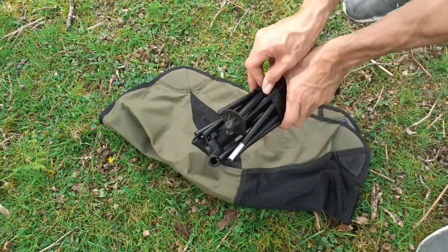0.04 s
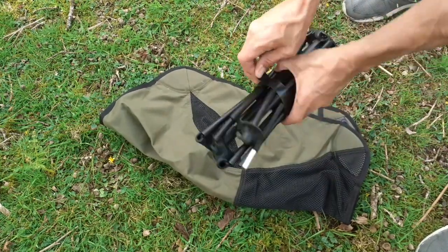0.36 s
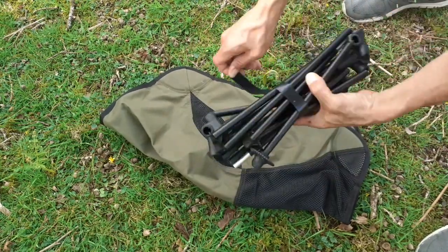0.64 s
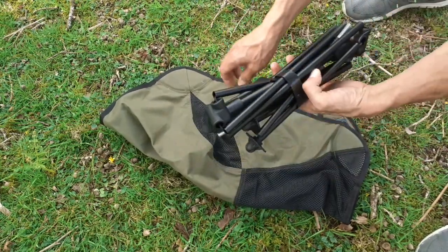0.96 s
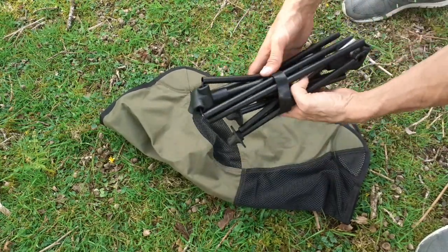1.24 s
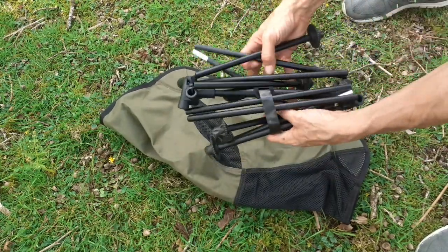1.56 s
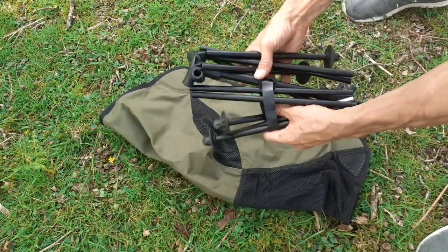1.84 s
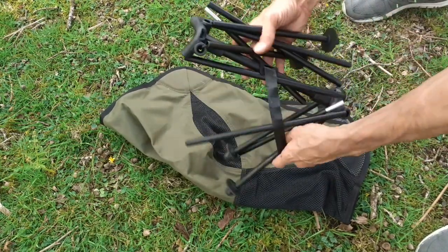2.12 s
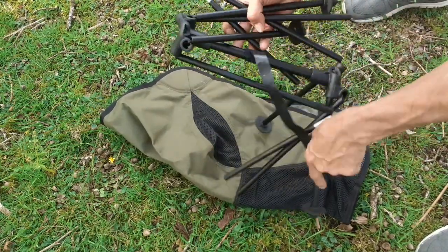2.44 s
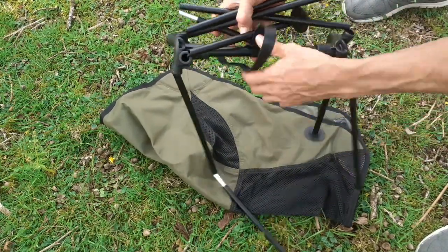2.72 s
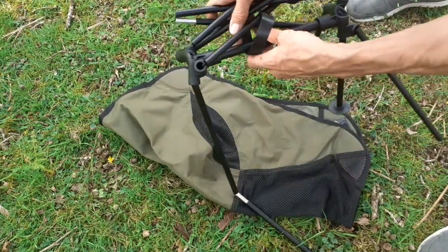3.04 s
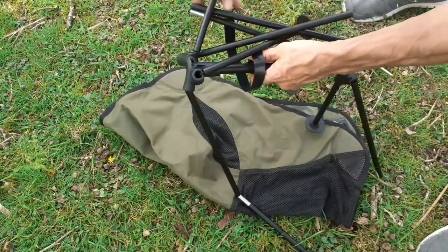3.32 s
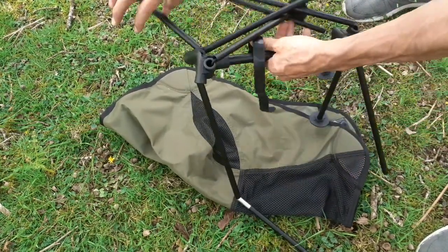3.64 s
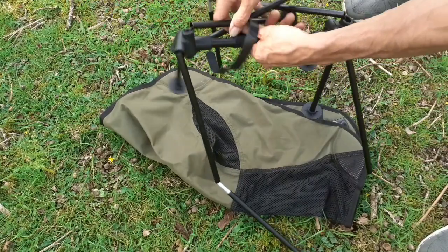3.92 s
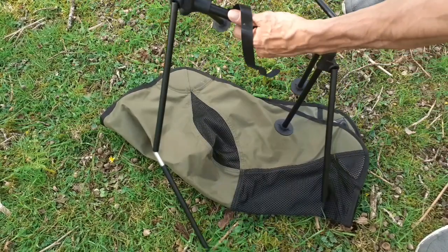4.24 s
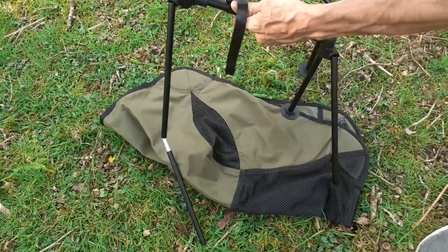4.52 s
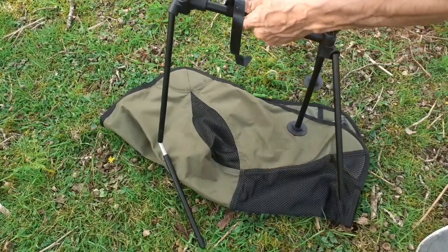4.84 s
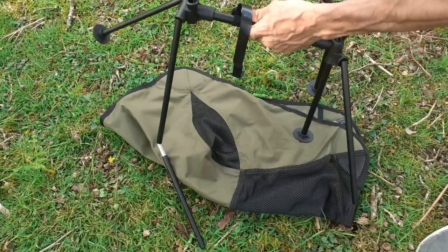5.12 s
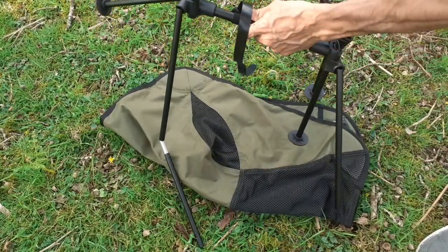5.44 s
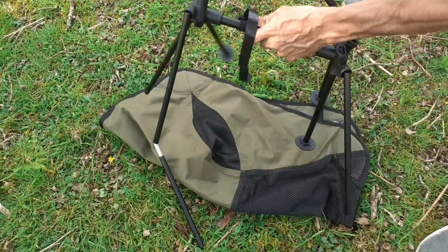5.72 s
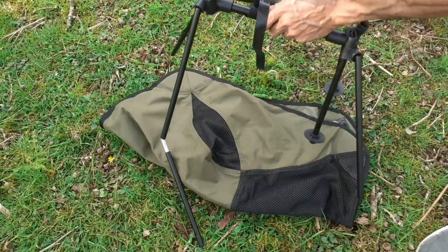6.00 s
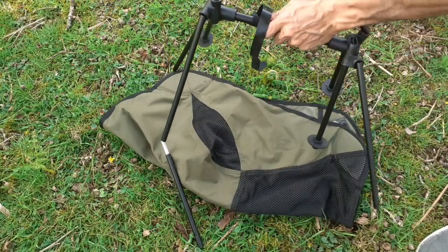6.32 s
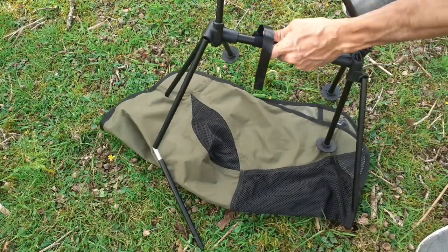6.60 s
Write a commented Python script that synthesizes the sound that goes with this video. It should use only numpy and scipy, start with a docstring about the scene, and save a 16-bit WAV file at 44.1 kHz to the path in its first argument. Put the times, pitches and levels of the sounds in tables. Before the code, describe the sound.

Close by outdoors, a fastening strap tears open and camp chair poles slide together and clack into place, with light wind.

```python
"""Unpacking a camp chair on a lawn

A hook-and-loop strap rips open close by, in a rush of tiny snaps. The bundled poles scrape over each
other and the canvas bag, and their elastic cords pull them into the plastic hubs with ringing clacks.
Light wind bumps the two microphones; the garden is quiet and gives only a faint echo."""
import sys
import numpy as np
from scipy import signal
from scipy.fft import rfft, irfft, next_fast_len
from scipy.io import wavfile
from scipy.ndimage import map_coordinates

SR = 44100
rng = np.random.default_rng(int(sys.argv[2]) if len(sys.argv) > 2 else 0)


def wrap_up_sound(samples):
    """Save the sound to the file named by the first command line argument, as 16-bit audio."""
    columns = np.atleast_2d(samples).T
    # keep every value between -1 and 1, then stretch to whole-number steps
    tamed = np.clip(columns, -1, 1)
    steps = np.round(tamed * 32767).astype(np.int16)
    wavfile.write(sys.argv[1], SR, steps)


N = 293909

# tone of poles scraping together: f/Hz, level/dB
SCRAPE_TONE = [(400, -35), (800, -7.5), (1200, -10.5), (1800, -0.5), (4400, 2), (7500, -1.5), (9000, -15),
               (11000, -31.5)]
# tone of the thin hiss above the scrape: f/Hz, level/dB
HISS_TONE = [(7000, -15.5), (9000, -5), (11000, -1.5), (13000, -9.5), (14000, -3.5), (16000, -15.5)]


def amp(db):
    """Turn decibels into a factor to multiply by."""
    return 10 ** (np.asarray(db) / 20)


def unit(x):
    """Scale a sound to an average strength (rms) of 1."""
    return x / np.sqrt(np.mean(x ** 2) + 1e-20)


def along(points, hz):
    """Read between the (f/Hz, value) points of a table, giving each octave equal room."""
    f, values = np.transpose(points)
    return np.interp(np.log(hz + 1), np.log(f), values)


def add(track, start, sound):
    """Mix a sound into the track at start seconds."""
    room = track[:, max(round(start * SR), 0):][:, :sound.shape[-1]]
    room += sound[:, :room.shape[-1]]


def wobble(rate, length):
    """A smooth curve through rate random values a second."""
    knots = rng.standard_normal(int(length * rate / SR) + 4)
    return map_coordinates(knots, [np.arange(length) * rate / SR])


def gesture(t, length, edge):
    """Fade in around t = 0 and out around t = length; a larger edge is gentler (all in seconds)."""
    return (1 + np.tanh(t / edge)) * (1 + np.tanh((length - t) / edge)) / 4


def filtered(x, response):
    """Turn each frequency up or down by response(hz)."""
    n = x.shape[-1]
    size = next_fast_len(n + 2048)
    return irfft(rfft(x, size) * response(np.fft.rfftfreq(size, 1 / SR)), size)[..., :n]


def coloured(x, tone):
    """Shape a sound with a tone table, then scale it to strength 1."""
    return unit(filtered(x, lambda hz: amp(along(tone, hz))))


def morphed(x, gain):
    """Filter a sound by gain(hz, t), so its tone changes over time."""
    hz, t, spectra = signal.stft(x, SR, nperseg=512)
    return signal.istft(spectra * gain(hz[:, None], t), SR, nperseg=512)[1][:, :x.shape[1]]


def stereo_noise(length, apart):
    """Left and right noise: the same when apart is 0, unrelated when it is 1."""
    common, own = rng.standard_normal((2, length))
    return unit(np.array([common + apart * own, common - apart * own]))


def grains(length, rate, life, spread_db):
    """The jumpy loudness of tiny random slips: about rate a second, each fading over life seconds."""
    sizes = amp(spread_db * np.clip(rng.standard_normal(length), -2, 2))
    slips = sizes * (rng.random(length) < rate / SR)
    decay = np.exp(-2 * np.arange(SR // 50) / SR / life)
    return unit(np.sqrt(np.abs(signal.fftconvolve(slips ** 2, decay)[:length])))


def resonance(hz, centre_hz, width_hz):
    """A peak of height 1 around a pitch at which something likes to ring."""
    return 1 / (1 + (2 * (hz - centre_hz) / width_hz) ** 2)


def ringing(hz, peaks, base_db):
    """Several ringing peaks on top of a flat base."""
    return amp(base_db) + sum(amp(db) * resonance(hz, f, width) for f, width, db in peaks)


def frame_gain(hz, base_db):
    """The chair's tubes and hubs boost the pitches at which they ring."""
    # ringing peaks of the frame: f/Hz, width/Hz, level/dB
    frame_peaks = [(2220, 3000, -3.5), (3170, 450, -9.5), (3980, 290, -4), (4450, 330, -8), (5010, 960, -4),
                   (6440, 400, -22), (7160, 1800, -5.5), (9900, 75, -0.5), (12300, 2200, 0.5)]
    return ringing(hz, frame_peaks, base_db)


def ripple(hz, depth_db, spacing_hz):
    """Many weaker rings: a new pattern of peaks and dips for every spot that is struck."""
    knots = rng.standard_normal(int(hz[-1] / spacing_hz) + 4)
    return amp(depth_db * map_coordinates(knots, [hz / spacing_hz]))


def patches(hz, t, depth_db, spacing_hz, life):
    """Peaks and dips that come and go as the point of contact travels."""
    where = np.broadcast_arrays(hz / spacing_hz, t / life)
    knots = rng.standard_normal([int(w.max()) + 2 for w in where])
    return amp(depth_db * map_coordinates(knots, where))


def garden_air():
    """The soft, steady hush of a quiet garden."""
    # tone of the hush: f/Hz, level/dB
    air_tone = [(30, -11.5), (120, -7), (450, 4.5), (1000, 0.5), (2000, -7.5), (7000, -14.5), (9000, -19),
                (16000, -27.5)]
    return amp(-65) * coloured(stereo_noise(N, apart=0.62), air_tone)


def garden_echo(x):
    """Sound scatters back from around the lawn; the highest pitches die first."""
    # time the echo takes to fade by 60 dB: f/Hz, t/s
    fade_times = [(200, .25), (2500, 0.37), (14000, 0.17)]
    hz, t, spectra = signal.stft(rng.standard_normal((2, SR // 2)), SR, nperseg=256)
    tail = signal.istft(spectra * amp(-60 * t / along(fade_times, hz)[:, None]), SR, nperseg=256)[1]
    return signal.fftconvolve(x, tail / np.linalg.norm(tail[0]), axes=1)[:, :N]


def wind():
    """From about 3 s on a light draught brushes the microphones, and gusts bump each one separately."""
    # tone of wind on a microphone: f/Hz, level/dB
    rumble_tone = [(25, -22.5), (55, 8), (115, 3.5), (230, -8.5), (400, -25), (700, -31.5), (1500, -84)]
    # gusts: t/s, length/s, level/dB, left minus right/dB
    gusts = [(3.142, .11, -45.5, 21), (3.282, 0.015, -26.5, -12.5), (3.305, 0.14, -38.5, -3),
             (3.457, 0.23, -51, -9), (4.036, 0.043, -51.5, -8), (4.184, 0.033, -50.5, 24.5),
             (5.493, 0.017, -47, 27.5), (5.736, 0.13, -53, 12.5), (6.206, 0.18, -48.5, 26)]
    fade_in = np.interp(np.arange(N) / SR, [2.9, 3], [0, 1])
    draught = fade_in * amp(4.6 * np.array([wobble(5.7, N), wobble(27, N)]))
    out = amp(-71.5) * draught * coloured(rng.standard_normal((2, N)), rumble_tone)
    lead_s = .02  # room for the fade-in
    t = np.arange(SR // 2) / SR - lead_s
    for start, length, db, side_db in gusts:
        bump = gesture(t, length, edge=0.0017) * amp(-4 * np.abs(t) / length)
        wake = amp(-17) * gesture(t, 2 * length, edge=0.0082)
        rumble = coloured(rng.standard_normal((2, len(t))), rumble_tone)
        swirl = (bump + wake) * rumble * amp(4 * wobble(50, len(t)))
        swirl /= np.sqrt(np.sum(swirl ** 2, axis=1, keepdims=True) / (length * SR))  # strength 1
        add(out, start - lead_s, amp([[db + side_db / 2], [db - side_db / 2]]) * swirl)
    return out


def jostling():
    """The loose poles keep brushing and ticking lightly while they lie in the hand."""
    held = gesture(np.arange(N) / SR - 1.15, length=4.35, edge=.05) * amp(2.5 * wobble(12, N))
    ticks = unit(grains(N, rate=92, life=.002, spread_db=5) + .9)
    tubes = filtered(ticks * stereo_noise(N, apart=0.55), lambda hz: frame_gain(hz, base_db=-3.5))
    return held * (amp(-55.5) * coloured(tubes, SCRAPE_TONE) + amp(-66.5) * coloured(tubes, HISS_TONE))


def sliding():
    """Sliding poles catch and slip, which makes them ring; the canvas adds a soft, lower rub."""
    # slides: start t/s, end t/s, relative level/dB, swell from start to end/dB, hiss over scrape/dB
    strokes = [(0.805, 0.904, -55.5, 7, -14), (1, 1.056, -44.5, 14.5, -23), (1.157, 1.2, -39, -10.5, -11.5),
               (1.291, 1.437, -42.5, -1.5, -15), (1.465, 1.583, -35.5, 4, -9.5),
               (1.659, 1.838, -40.5, -5, -10.5), (1.833, 2.123, -55.5, -12, -5.5),
               (2.123, 2.154, -37, 16, -11), (2.202, 2.244, -33.5, 0, -7.5), (2.299, 2.419, -37.5, 8, -5.5),
               (2.513, 2.591, -41.5, 1, -2), (2.908, 2.984, -51.5, 1, -9), (3.117, 3.244, -38, 0, -10),
               (3.314, 3.42, -38, -3.5, -7.5), (3.526, 3.712, -43, 3, -11.5),
               (3.764, 3.856, -49.5, 10, -14), (3.898, 3.926, -35.5, 19.5, -11),
               (4.101, 4.279, -37, 7, -9.5), (4.307, 4.539, -37, 6.5, -6), (4.55, 4.662, -42, -13.5, -15),
               (4.679, 4.774, -40.5, 2.5, -20), (4.889, 4.963, -40.5, -11.5, -16.5),
               (5.026, 5.27, -44, -16, -20), (5.275, 5.408, -38.5, 3.5, -6),
               (5.469, 5.582, -39.5, 9, -13.5), (5.958, 6.027, -58.5, 5, -5), (6.162, 6.179, -45.5, 2, -20),
               (6.384, 6.482, -60.5, -18, -1)]
    # ringing peaks of one freed pole: f/Hz, width/Hz, level/dB
    pole_peaks = [(2160, 340, -4.5), (3390, 340, -3.5), (3880, 260, -2), (4458, 260, -0.5),
                  (6250, 150, -11.5), (7160, 860, -7.5), (9190, 130, -1), (12310, 450, 1.5)]
    # tone of rubbed canvas: f/Hz, level/dB
    canvas_tone = [(90, -24), (220, -12.5), (600, -3.5), (1100, 0.5), (2000, 7), (4000, -43.5)]
    bundled = lambda hz: frame_gain(hz, base_db=-0.5)  # dull rub fills in between the peaks
    freed = lambda hz: ringing(hz, pole_peaks, base_db=-15)
    bundle_opens_s, lead_s = 3.4, .04
    out = np.zeros((2, N))
    t = np.arange(2 * SR // 5) / SR - lead_s
    for start, end, db, swell_db, hiss_db in strokes:
        length = max(end - start, .01)
        progress = np.clip(t / length, 0, 1)
        unsteady_db = 1.4 * wobble(43.3, len(t))
        speed = gesture(t, length, edge=0.015) * amp(swell_db * (progress - .5) + unsteady_db)
        slips = unit(grains(len(t), rate=900, life=.001, spread_db=4) + 1)
        rings = bundled if start < bundle_opens_s else freed
        tube_gain = lambda hz, s: rings(hz) * patches(hz, s, depth_db=3.6, spacing_hz=300, life=.06)
        tubes = morphed(slips * stereo_noise(len(t), apart=0.81), tube_gain)
        cloth = amp(-16) * coloured(slips * stereo_noise(len(t), apart=.3), canvas_tone)
        rub = coloured(tubes, SCRAPE_TONE) + amp(hiss_db) * coloured(tubes, HISS_TONE) + cloth
        add(out, start - lead_s, amp(db) * speed * rub)
    return out * amp([[1.2], [-.8]])  # a little louder on the left


def strap():
    """Rows of hooks tear out of their loops, and the tight strap drums along."""
    # tone of the rip: f/Hz, level/dB
    rip_tone = [(600, -31.5), (1300, -16), (2100, -11), (2800, -6), (5000, -6), (7600, 3), (9500, -2),
                (14800, 0), (16000, -21)]
    # tone of the drumming strap: f/Hz, level/dB
    drum_tone = [(90, -22), (200, 2), (600, 2.5), (1100, 1), (2000, -2), (4000, -29)]
    # single hooks letting go: t/s, level/dB
    single_hooks = [(.009, -35), (.033, -42), (0.152, -43), (0.16, -48), (.18, -35.5), (0.27, -28),
                    (0.304, -21.5), (.636, -20.5), (.719, -38.5)]
    peel_s, full_speed_s, free_s = .2, 0.32, 0.6384
    t = np.arange(N) / SR
    rise_db = -16.5 * np.maximum(full_speed_s - t, 0) / (full_speed_s - peel_s)
    release_db = -1709 * np.maximum(t - free_s, 0)
    slack_db = -5 * np.exp(-((t - 0.413) / 0.027) ** 2)  # the pull eases once, halfway
    pull = (t > peel_s) * amp(rise_db + release_db + slack_db)
    # as the freed part of the strap grows, it rings lower and drums louder
    ring_hz = lambda s: 5540 / (1 + np.maximum(s - peel_s, 0) / 0.16)
    drum_gain = amp(-49.5 - 107 * np.maximum(0.5 - t, 0))
    ring = lambda hz, s: 1 + 0.65 * resonance(hz, ring_hz(s), width_hz=1400)
    strap_gain = lambda hz, s: ring(hz, s) * patches(hz, s, depth_db=3, spacing_hz=670, life=.035)
    tearing = unit(grains(N, rate=520, life=.001, spread_db=3.6) + .35)
    hooks = morphed(tearing * stereo_noise(N, apart=0.43), strap_gain)
    drum = drum_gain * coloured(tearing * stereo_noise(N, apart=0.33), drum_tone)
    out = pull * (amp(-29.5) * coloured(hooks, rip_tone) + drum)
    age = np.arange(SR // 50) / SR
    for start, db in single_hooks:
        snap = coloured(stereo_noise(len(age), apart=0.58), rip_tone)
        add(out, start, amp(db - 60 * age / 0.02) * snap)
    return out


def clack(knock_db, hard_db, ping_hz, ping_db):
    """One pole hits home: many short rings blur into a crack, and one stands out as a ping."""
    t = np.arange(SR // 16) / SR
    # a harder hit has less body, more bright snap and a shorter crack
    body_db, snap_db = -4 - hard_db, -11 + hard_db
    crack_s = 0.02 * 2 ** (-hard_db / 17.5)  # time to fade by 60 dB
    ping_s, shiver_s, thud_s = 0.018, 0.087, 0.047  # likewise
    tone = [(60, knock_db - 2), (250, knock_db + 0.5), (700, knock_db + 4), (1100, knock_db + 2.5),
            (1700, body_db - 4), (2800, body_db), (4500, -3.6), (7800, 1),
            (9500, snap_db + 5), (16000, snap_db - 2.5)]  # f/Hz, level/dB
    frame = lambda hz: frame_gain(hz, base_db=-1) * ripple(hz, depth_db=2, spacing_hz=257.7)
    rings = filtered(stereo_noise(len(t), apart=0.36), lambda hz: amp(along(tone, hz)) * frame(hz))
    rings /= np.sqrt(np.mean(rings[:, :SR // 250] ** 2))  # strength 1 over the first 4 ms
    rise = 1 - np.exp(-t / .00025)
    damped_t = np.maximum(t - .001, 0)  # the joint is pressed shut, then hand and cord quiet it
    crack = rings * amp(-60 * damped_t / crack_s)
    ping = np.sqrt(2) * amp(ping_db - 60 * damped_t / ping_s) * np.sin(2 * np.pi * ping_hz * t)
    # the rest of the frame shivers on, and a hard, heavy knock jolts the whole bundle
    shiver = rings * amp(-22 - 60 * t / shiver_s)
    thud = amp(-22.5 + knock_db + hard_db - 60 * t / thud_s) * np.sin(2 * np.pi * 75 * t)
    return rise * (crack + ping + shiver) + thud


def poles():
    """The poles knock and snap into their hubs, each hit with its own strength and tone."""
    # hits: t/s, relative level/dB, low knock/dB, hardness/dB, ping f/Hz, ping over crack/dB
    hits = [(0.8451, -37, -33, -5.5, 4800, -9), (1.0268, -12.5, -8, 7, 6880, -5),
            (1.239, -35.5, -28, -1, 4130, -3), (1.2953, -25.5, -29, 2.5, 6400, 0),
            (1.307, -27.5, -29, 7, 5770, -5), (1.338, -28, -16, 1.5, 6730, -3),
            (1.3706, -28.5, -29, -4, 6580, -10), (1.4017, -22.5, -33, 2, 7010, -4.5),
            (1.6168, -29, -22.5, 0, 3640, -11), (1.656, -30, -19, 1, 5450, -17.5),
            (1.6823, -31.5, -21, -7.5, 3850, -4), (1.7435, -28.5, -28, 3, 4400, -10),
            (1.804, -10, -17.5, 7, 8070, -7), (1.8692, -21.5, -26, 4, 7520, -9),
            (2.2665, -28, -11.5, 1.5, 6400, -6), (2.2947, -16.5, -18.5, 3, 2445, -2.5),
            (2.334, -30, -12, 5, 4970, -9), (2.441, -25, -21.5, 1.5, 7500, -7),
            (2.6039, -13, -10, -2.5, 1964, -7), (2.7656, -32.5, -19.5, -2, 4330, -9),
            (2.8264, -13, -24, 1, 3880, -7.5), (2.8496, -33.5, -16, -0.5, 5220, -12),
            (3.1521, -14.5, -15, -0.5, 3760, -4), (3.1731, -15.5, -29, 0.5, 6880, -7),
            (3.2122, -16, -21, 0.5, 5110, -3), (3.2727, -30.5, -4, -1.5, 2400, -6.5),
            (3.3087, -16, -45, 1, 4950, -0.5), (3.5576, -21.5, -16.5, -5.5, 3784, -0.5),
            (3.762, -41, -15, -5, 3510, -4), (3.8573, -30, -25, -3, 6940, -13),
            (3.9744, -24.5, -25.5, -2, 2960, -1), (4.0482, -12.5, -23.5, 3, 9220, -6),
            (4.334, -30, -18, 0.5, 4560, -1.5), (4.578, -28.5, -16, -5, 7400, -17),
            (4.5891, -25.5, -14, 5.5, 5640, -8), (4.6872, -24.5, -26, -1.5, 5400, -7),
            (4.6995, -30, -15, -5, 3420, -8), (5.456, -36.5, -0.5, -7.5, 3500, -7),
            (5.514, -23, 0, -8.5, 535, -7.5), (5.6545, -36, -2, -8, 4260, -0.5),
            (5.6977, -11.5, -17, -4, 2360, -4.5), (5.7074, -26, -7.5, -4.5, 4530, -2),
            (6.0226, -29, -5.5, -9.5, 2544, -2.5), (6.372, -32, -11, 0.5, 2085, -11),
            (6.42, -39, 9.5, -5, 1980, -8)]
    out = np.zeros((2, N))
    for start, db, *colour in hits:
        add(out, start, amp(db) * clack(*colour))
    return out * amp([[3.4], [1.1]])  # the clacks are a little louder on the left


def placed(x):
    """The chair swings from right to left; its sound reaches the farther microphone a little later."""
    # how late the left side hears it (negative is early): t/s, delay/samples
    left_delays = [(2.7, 2), (3.3, 1.15), (4.3, 1.17), (5.2, -2.5)]
    n = np.arange(N)
    lag = np.interp(n / SR, *np.transpose(left_delays))
    left = map_coordinates(x[0], [n - lag / 2], order=5)
    right = map_coordinates(x[1], [n + lag / 2], order=5)
    return np.array([left, right])


def scene():
    """Mix the chair with the garden air, its own faint echo and the wind."""
    chair = placed(strap() + sliding() + jostling() + poles())
    return garden_air() + amp(-23) * garden_echo(chair) + wind() + chair


def record(dry):
    """Cut the deepest rumble, round off the loudest snaps and remove the very highest pitches."""
    low_cut_hz, top_hz, ceiling = 46, 16100, .93
    lean = signal.sosfilt(signal.butter(4, low_cut_hz, "high", fs=SR, output="sos"), dry)
    rounded = lean / (1 + np.abs(lean / ceiling) ** 6) ** (1 / 6)
    return filtered(rounded, lambda hz: 1 / np.sqrt(1 + (hz / top_hz) ** 300))


dry = scene()
out = record(dry)
wrap_up_sound(out)
```